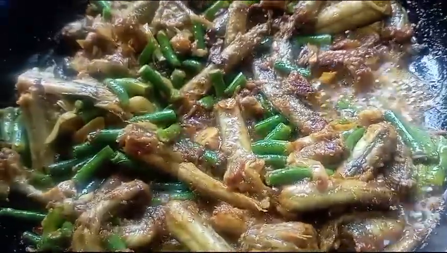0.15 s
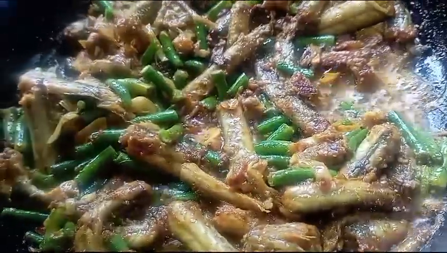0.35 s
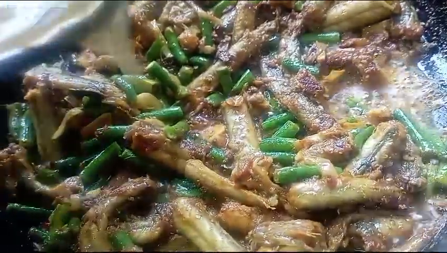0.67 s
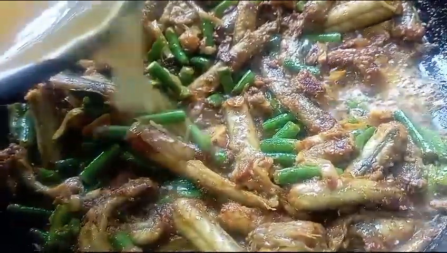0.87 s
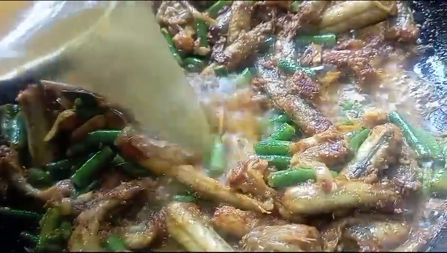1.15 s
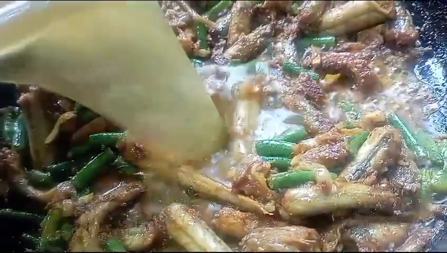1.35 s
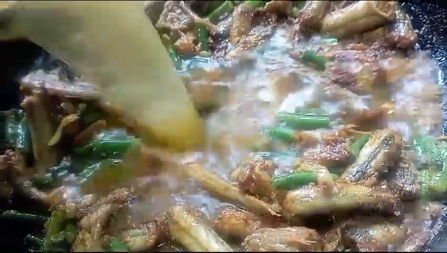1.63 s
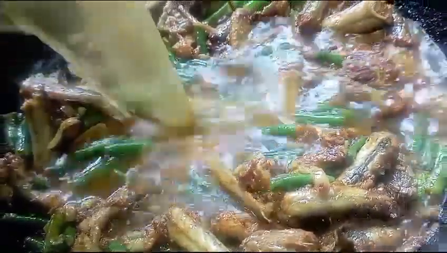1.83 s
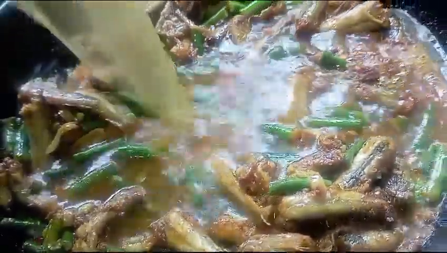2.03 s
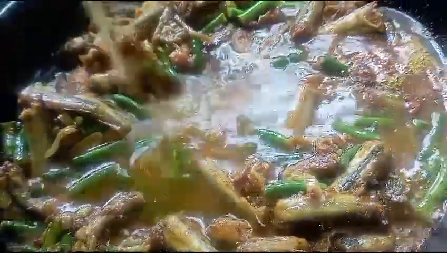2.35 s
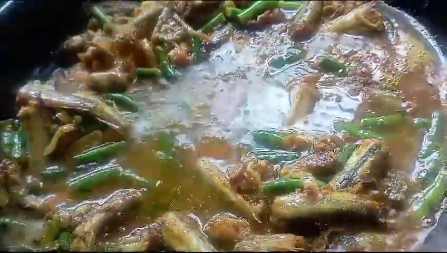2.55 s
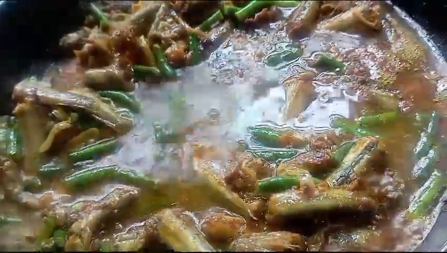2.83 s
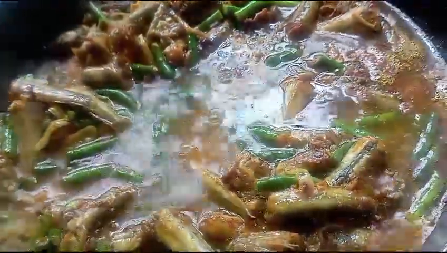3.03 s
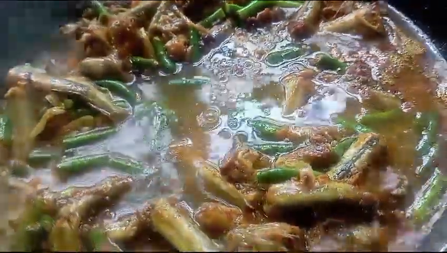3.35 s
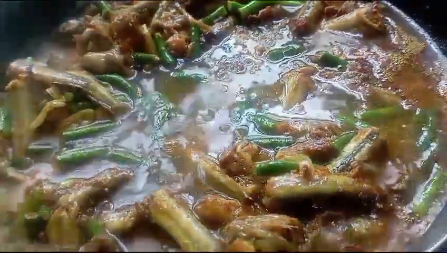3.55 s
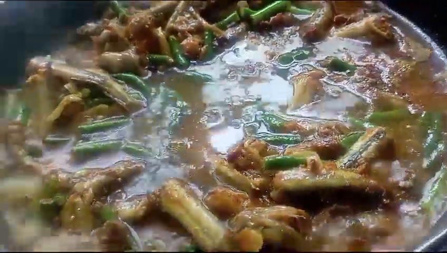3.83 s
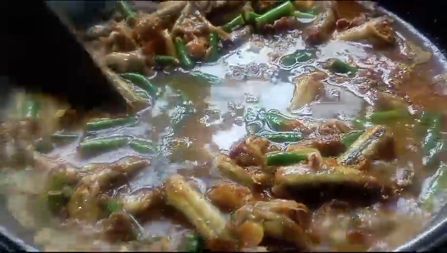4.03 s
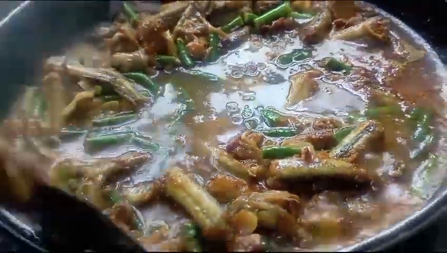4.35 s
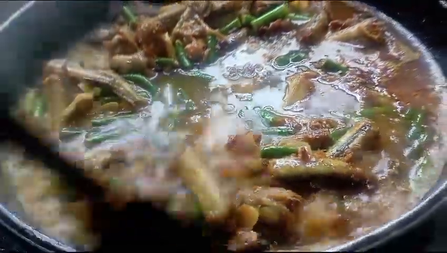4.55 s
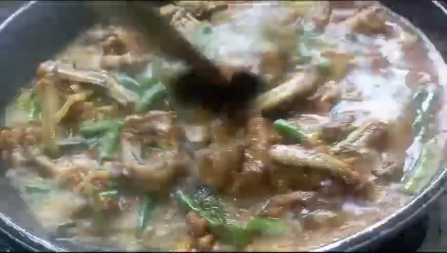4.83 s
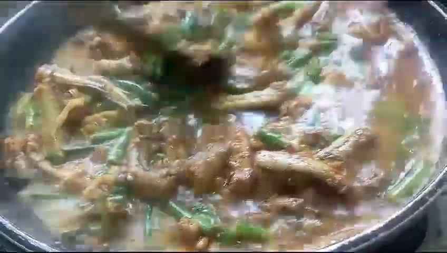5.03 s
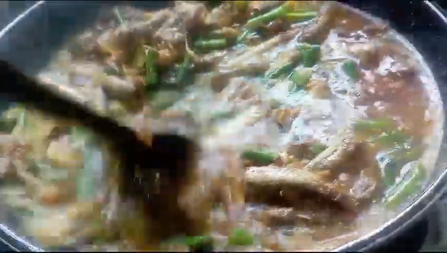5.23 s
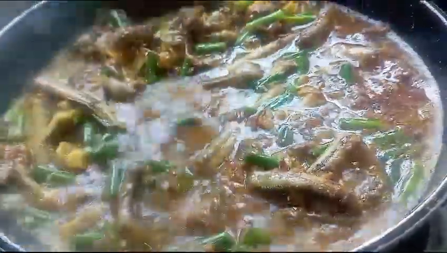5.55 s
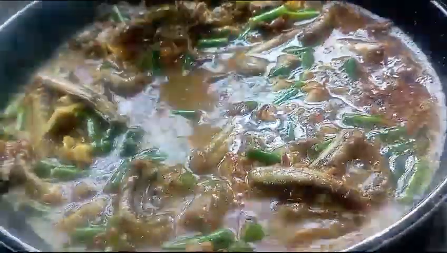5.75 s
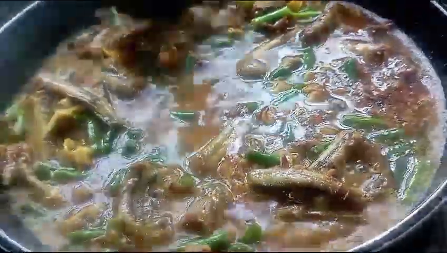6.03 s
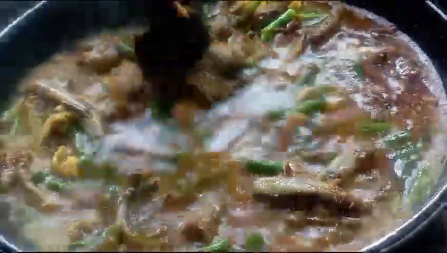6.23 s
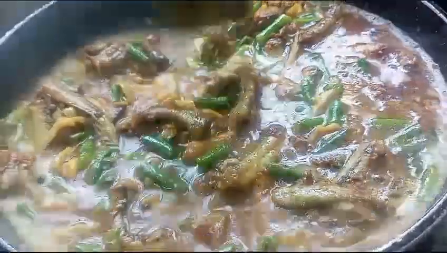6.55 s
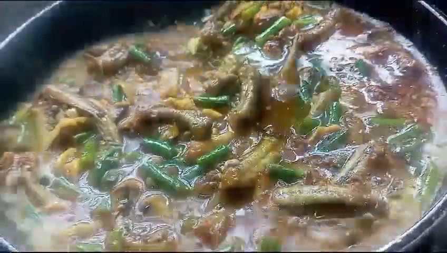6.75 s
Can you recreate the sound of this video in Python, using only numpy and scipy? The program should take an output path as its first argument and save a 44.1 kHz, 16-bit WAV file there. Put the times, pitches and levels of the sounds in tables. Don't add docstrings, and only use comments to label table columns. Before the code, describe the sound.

Very close to a wide pan on a kitchen stove, food fries with a thin sizzle and sharp crackles. Liquid pours in and the sound swells into dense, bright, steamy hissing, with loud snaps and drops thumping right at the microphone. Low gurgling bubbles join, and the boil gradually eases to a simmer, with one brief dull spatula scrape. A soft burner flutter lies beneath.

```python
import sys
import numpy as np
from scipy import signal
from scipy.fft import rfft, irfft
from scipy.io import wavfile

SR = 44100
rng = np.random.default_rng(int(sys.argv[2]) if len(sys.argv) > 2 else 0)


def decibels_to_gain(level_db):
    exponent = np.asarray(level_db, float) / 20
    return 10 ** exponent


def master_out(mix):
    frames = np.transpose(np.atleast_2d(mix))
    ceiling = np.clip(frames, -1, 1)
    pcm = np.round(ceiling * 32767).astype(np.int16)
    wavfile.write(sys.argv[1], SR, pcm)


N = 303829
FAR_LAG_S = 0.00034
POUR_S, FLOOD_S, SETTLE_S = 1.85, 0.57, 1.16


def rms_one(x):
    return x / np.sqrt(np.mean(x ** 2, axis=-1, keepdims=True) + 1e-20)


def in_time(rows):
    s, *columns = np.transpose(rows)
    return [np.interp(np.arange(N) / SR, s, c) for c in columns]


def drift(rate_hz):
    r = np.exp(-80 * np.pi * rate_hz / SR)
    noise = rng.standard_normal(N // 40 + 2002)
    slow = signal.lfilter([1], [1, -2 * r, r * r], noise)[2000:]
    return np.interp(np.arange(N) / 40, np.arange(len(slow)), rms_one(slow))


def colour(x, points, ripple=()):
    size = 8192
    hz = np.maximum(np.arange(size // 2 + 1) * SR / size, 10)
    point_hz, point_db = np.transpose(points)
    db = np.interp(np.log(hz), np.log(point_hz), point_db)
    for top_hz, width_hz, bump_db in ripple:
        db += bump_db / (1 + (2 * (hz - top_hz) / width_hz) ** 2)
    cepstrum = irfft(np.log(decibels_to_gain(db)))
    cepstrum[1:size // 2] *= 2
    cepstrum[size // 2 + 1:] = 0
    response = irfft(np.exp(rfft(cepstrum)))
    return signal.fftconvolve(x, response)[:N]


def band(x, low_hz, high_hz, order=1):
    sos = signal.butter(order, [low_hz, high_hz], "band", fs=SR, output="sos")
    return signal.sosfilt(sos, np.asarray(x) + 1e-18)


def late(x, s):
    return np.interp(np.arange(N) - s * SR, np.arange(N), x, left=0)


def clicks(per_s, spread_db):
    size_db = spread_db * np.minimum(rng.exponential(1, N), 4.2)
    sizes = rms_one(decibels_to_gain(size_db) * rng.choice([-1, 1], N))
    return sizes * (rng.random(N) < per_s / SR) * np.sqrt(SR / per_s)


def flooding():
    return np.clip((np.arange(N) / SR - POUR_S) / FLOOD_S, 0, 1)


# frequency in Hz, level in dB per Hz.
FLAME_SPECTRUM = [(21, -73), (35, -30), (70, -28), (85, -22.5), (140, -1), (216, -6), (295, -10.5),
                  (393, -13), (841, -20.5), (900, -17.5), (1170, -70), (1980, -120)]


def flame():
    mid, side = (colour(w, FLAME_SPECTRUM) for w in rng.standard_normal((2, N)))
    hum = decibels_to_gain(-65 + 2.0 * drift(3)) * np.sin(2 * np.pi * 101 * np.arange(N) / SR)
    flutter = decibels_to_gain(-55 + 1.0 * drift(9))
    ports = mid + 0.19 * side * [[1], [-1]]
    return flutter * ports / np.std(mid) + hum


def rumble():
    shake = rms_one(band(rng.standard_normal(N), 76, 220, order=3))
    return decibels_to_gain(-65 + 2.1 * drift(6)) * flooding() * shake


# frequency in Hz, width in Hz, level in dB.
PAN_MODES = [(215, 50, -4), (330, 50, -5), (470, 50, 0), (560, 50, 1), (710, 80, -1)]


def scrape():
    start_s, attack_s, hold_s, release_s = 6.019, .001, .08, .015
    level_db, touch_db = -43, 30
    slips = clicks(2500, spread_db=1)
    times_s = np.cumsum([start_s, attack_s, hold_s, release_s])
    stroke, = in_time(np.column_stack([times_s, [0, 1, 1, 0]]))
    touch = decibels_to_gain(touch_db) * (np.arange(N) == round((start_s + attack_s) * SR))
    push = [slips, stroke * slips - touch]
    steady, body = sum(decibels_to_gain(db) * band(push, hz - width / 2, hz + width / 2) for hz, width, db in PAN_MODES)
    body = band(body, 190, 730, order=2) / np.std(steady)
    return decibels_to_gain(level_db) * body * decibels_to_gain(np.array([[1], [-1]]))


def gurgle(level_db):
    out = np.zeros((2, N))
    for hz in np.geomspace(280, 950, 8):
        sources = [clicks(70, spread_db=1.5), rng.standard_normal(N)]
        mid, own = band(sources, hz / 1.124, hz * 1.048)
        ports = np.array([mid + .5 * own, 0.71 * (late(mid, FAR_LAG_S) - .5 * own)])
        out += decibels_to_gain(-4 * abs(np.log2(hz / 500))) * ports
    return decibels_to_gain(level_db) * out / np.std(out[0])


def pings(level_db):
    out = np.zeros((2, N))
    for hz in np.geomspace(1100, 9000, 12):
        ring = band(clicks(14, spread_db=5), hz / 1.02, hz * 1.02)
        out += [ring, late(ring, FAR_LAG_S)]
    return decibels_to_gain(level_db) * out


# time in seconds, peak in dB, push (+1) or pull (-1).
SMALL_DROPS = [(2.070, -25, -1), (2.0885, -22, 1), (2.115, -27, 1), (2.1483, -20, 1), (2.1779, -25, 1),
               (2.2075, -23, 1), (2.213, -20.5, 1), (2.268, -25, -1), (2.2774, -18.5, 1), (2.168, -29, -1),
               (2.3346, -25, 1), (2.3502, -26, -1), (2.371, -21, -1), (2.383, -26, -1), (2.432, -21, 1),
               (2.5738, -29, -1), (2.592, -23.5, 1), (2.63, -29, -1), (2.7242, -24, 1), (2.82, -31, 1),
               (2.87, -26, -1), (2.9372, -21.5, 1), (3.336, -25, 1), (3.545, -25, -1), (3.5637, -31, -1),
               (3.729, -29, 1), (3.803, -27, 1), (3.811, -31, -1), (5.397, -29, 1), (5.55, -30, 1)]
# time in seconds, peak in dB, push or pull, rise in s, length in s.
LARGE_DROPS = [
    (2.3121, -8.3, -1, .001, .05),
    (2.4562, -3, 1, .0013, .0075),
    (2.463, -19.5, -1, .0006, .00088),
    (2.8766, -20, -1, .00024, .0015),
    (2.9085, -6.8, 1, .0018, .02),
]


def spray(per_s):
    small_rise_s, small_length_s = 0.00014, 0.00068
    snap_share, snap_power, snap_at = .22, 24, .85
    cut = np.tile(signal.butter(2, 74, "high", fs=SR, output="sos"), (2, 1))
    out, t = np.zeros(N + 4000), np.arange(4000) / SR
    drops = list(LARGE_DROPS) + [(*drop, small_rise_s, small_length_s) for drop in SMALL_DROPS]
    for s, peak_db, sign, rise, length in drops:
        up, snap = np.clip([t / rise, (t / rise / snap_at) ** snap_power], 0, 1)
        push = (1 - snap_share) * up ** 2 + snap_share * snap
        shove = signal.sosfilt(cut, push * np.exp(-t / length))
        at = round((s - rise) * SR)
        out[at:at + 4000] += np.sign(sign) * decibels_to_gain(peak_db) * shove / shove.max()
    mist = clicks(per_s, spread_db=-1) * np.sqrt(per_s)
    return out[:N] + decibels_to_gain(-64) * band(mist, 70, 900)


# time in seconds, peak at the near port in dB, peak at the far port in dB.
CRACKS = [(0.011, -14.7, -28.8), (0.024, -5.7, -20.2), (0.063, -12.7, -27.0), (0.1835, -10, -24.7),
          (0.2315, -11.4, -28.8), (0.2627, -13.5, -29.3), (0.4403, -9.1, -19.1), (0.453, -13.4, -17.2),
          (0.5648, -12.7, -32.8), (0.781, -12.4, -30.2), (0.9276, -15.2, -26.1), (1.1058, -13.1, -27.9),
          (1.5054, -10, -30), (1.6192, -13.5, -32.5), (1.6949, -13.3, -31.2), (1.7614, -12.7, -31.0),
          (1.7955, -9.1, -30.6), (1.8875, -13.7, -27.2), (1.9951, -10.0, -20.3), (2.007, -10.9, -19.2),
          (2.059, -7.9, -17.9), (2.1484, -7.2, -19.5), (2.2137, -5.1, -19.0), (2.2732, -6.0, -19.2),
          (2.9082, -5, -1.5), (2.9103, -10, -8), (3.2863, -7.2, -17.4), (3.7262, -5.7, -20.9),
          (5.0846, -7.7, -19.3), (5.4396, -6.8, -20.0)]


def cracks():
    click_gain_db = np.array([12.5, 17])
    out, t = np.zeros((2, N + 400)), np.arange(400) / SR
    spits = 75
    when, size = rng.random(spits), rng.standard_normal((spits, 2))
    spit_rows = np.column_stack([.002 + when * 1.95, (-17.5, -32) + 2.0 * size])
    bursts = np.vstack([CRACKS, spit_rows])
    for (s, *peaks_db), rag in zip(bursts, rng.standard_normal((len(bursts), 2, 400))):
        tail = rag * np.exp(-t / np.array([[.0007], [.001]])) * [[.1], [.22]]
        tail[:, 0] = np.sign(rag[:, 0])
        at = round((s - .00015) * SR)
        out[:, at:at + 400] += decibels_to_gain(peaks_db + click_gain_db)[:, None] * tail
    near = band(out[0, :N], 2900, 19000)
    far = band(late(out[1, :N], FAR_LAG_S), 1100, 19000)
    return [near, far]


# time in seconds, level in dB.
VIGOUR = [(0, -39.5), (.3, -41), (.8, -43), (1.1, -47), (1.4, -44), (1.75, -42), (1.95, -40), (2.06, -30.5),
          (2.3, -28), (2.9, -28), (3.25, -30), (3.55, -28), (4.1, -30.5), (4.5, -32), (5.3, -29.5),
          (5.75, -32), (6.6, -33), (6.89, -35)]
# strength in dB, share of the vigour's swing, gain once flooded in dB,
# gain once settled in dB.
BUBBLES = [
    (-24.5, 0.23, 5, -1),
    (-26.5, 0.23, 3.0, 7.5),
    (-25, 0.31, 6.0, -3.5),
    (-29.0, 1.0, -0.08, -0.16),
]


def bubble_levels():
    flooded = flooding()
    since_s = np.maximum(np.arange(N) / SR - POUR_S, 0)
    settled = 1 - np.exp(-(since_s / SETTLE_S) ** 2)
    swing_db = in_time(VIGOUR)[0] + 40 + (1.5 - 1.12 * settled) * drift(13)
    return np.array([db + share * swing_db + flood_db * flooded + settle_db * settled
                     for db, share, flood_db, settle_db in BUBBLES])


# frequency in Hz, part from 0 to 1.
DIRECT_PART = [(900, 0.63), (1700, 0.4), (3200, 0.71), (5000, 0.17), (12000, 0.29)]


def sizzle(per_s, hiss, levels_db):
    out, clump = np.zeros((2, N)), drift(46)
    edges = np.geomspace(700, 20000, 9)
    for low, high in zip(edges, edges[1:]):
        hz = np.sqrt(low * high)
        size = np.interp(np.log(hz), np.log([1500, 2800, 4600, 8000]), [0, 1, 2, 3])
        level_db = sum(np.clip(1 - abs(size - k), 0, 1) * db for k, db in enumerate(levels_db))
        swell = decibels_to_gain(level_db + (0.83 * clump + 1.42 * drift(9.9)) * (1.5 - hiss))
        bursts = np.array([clicks(per_s / 4, spread_db=4.0), clicks(per_s / 2.5, spread_db=1.5)])
        near, scattered = np.sqrt(1 - hiss ** 2) * bursts + hiss * rng.standard_normal((2, N))
        direct = np.clip(np.interp(hz, *np.transpose(DIRECT_PART)), 0, 1)
        delayed = late(near, FAR_LAG_S * rng.uniform(0.81, 1.32))
        far = direct * delayed + np.sqrt(1 - direct ** 2) * scattered
        out += swell * band([near, far], low, high)
    return out


# time in seconds, bursts per second, share of smooth hiss, gurgle in dB,
# spray drops per second.
BOIL = [
    (0, 1760, 0.56, -91, 2),
    (1.9, 1900, 0.8, -55.5, 1.7),
    (2.1, 4250, 0.64, -54, 60),
    (3, 4440, 0.82, -46.5, 83),
    (4, 5200, 0.82, -47.5, 36),
    (5, 4500, 0.82, -49.5, 20),
    (6, 4600, 0.86, -50, 15),
    (6.89, 4100, 0.86, -51, 10),
]
# frequency in Hz, level in dB per Hz.
NEAR_PORT = [(300, -9.5), (500, -7.5), (900, -22.5), (1500, -13.5), (2500, -14), (4000, -12.5), (6500, -9),
             (8500, -3), (9500, 1.9), (10200, 3.5), (11000, 0), (12500, -3), (15800, -8.5)]
FAR_PORT = [(300, -11), (500, -22), (900, -20.5), (1500, -20), (1950, -13), (2300, -16), (2800, -4.5),
            (3600, -5), (5000, -5), (6000, -7.5), (7500, -12), (10000, -18.5), (15800, -17)]
# frequency in Hz, width in Hz, level in dB.
NEAR_RIPPLE = [(409, 26, -7), (619, 27, -12), (767, 26, -5), (847, 37, 4.5), (906, 46, -11.5),
               (1274, 160, -2), (1520, 80, 1), (1675, 140, -8), (2020, 110, -2.5), (2410, 240, 2.5),
               (2650, 135, -9.5), (15200, 1900, 1)]
FAR_RIPPLE = [(268, 38, 6), (338, 200, -4.5), (485, 37, 3.5), (635, 46, -2.5), (853, 55, 2), (1060, 50, 1),
              (1265, 60, -2), (1600, 89, 2.5), (1610, 80, 0), (2160, 320, -3), (2597, 176, 4),
              (3180, 370, -0.5), (3550, 170, 1.5), (4300, 250, 3)]


def scene():
    per_s, hiss, gurgle_db, drops_per_s = in_time(BOIL)
    levels_db = bubble_levels()
    low = flame() + rumble() + scrape() + gurgle(gurgle_db)
    pan = pings(levels_db[2] - 10.5) + cracks() + sizzle(per_s, np.clip(hiss, 0, .98), levels_db)
    flat = [(10, 0), (20000, 0)]
    near = colour(pan[0], NEAR_PORT, NEAR_RIPPLE) + colour(low[0], flat, NEAR_RIPPLE)
    far = colour(pan[1], FAR_PORT, FAR_RIPPLE) + colour(low[1], flat, FAR_RIPPLE)
    return np.array([near + spray(drops_per_s), far])


def roll_off(x):
    return signal.sosfilt(signal.butter(12, 16580, fs=SR, output="sos"), x)


def record(dry):
    steep = signal.ellip(16, .3, 100, 15760, fs=SR, output="sos")
    mix = signal.sosfilt(steep, dry)
    return roll_off(mix)


dry = scene()
out = record(dry)
master_out(out)
```